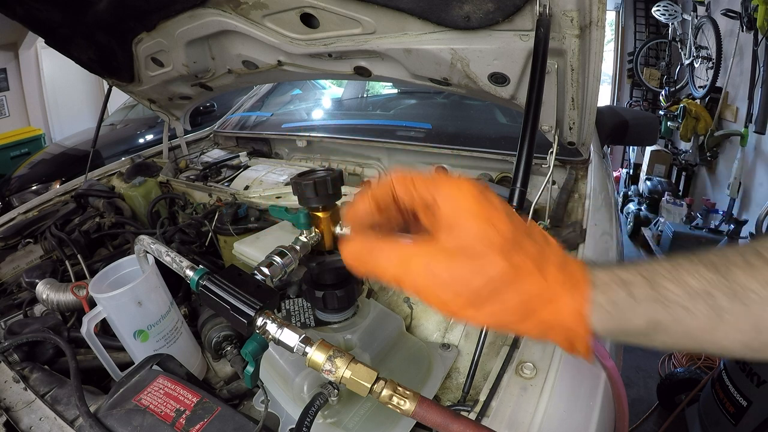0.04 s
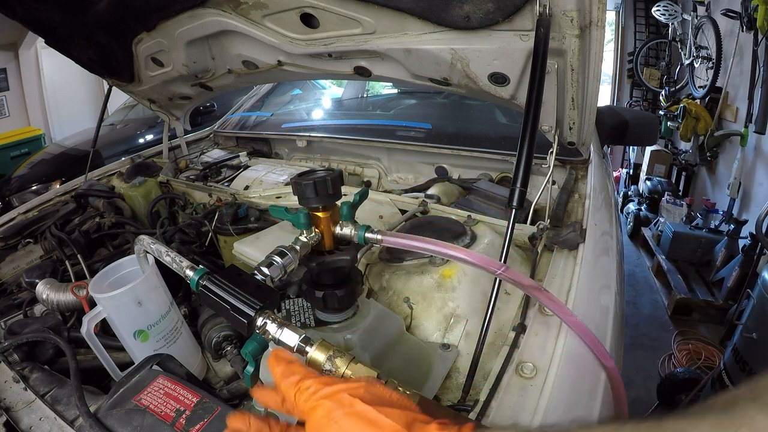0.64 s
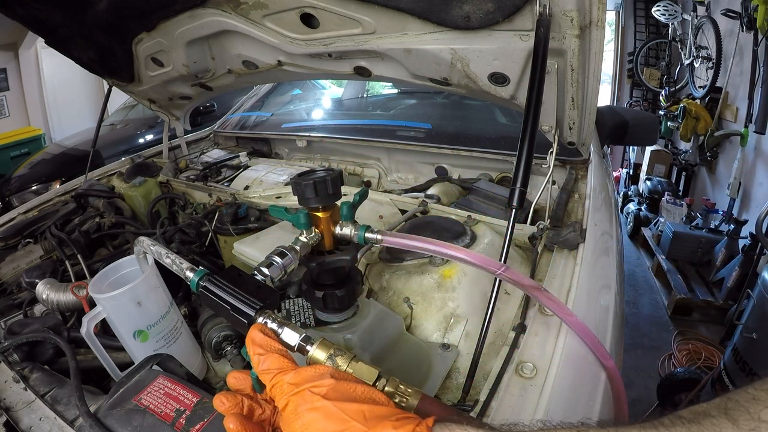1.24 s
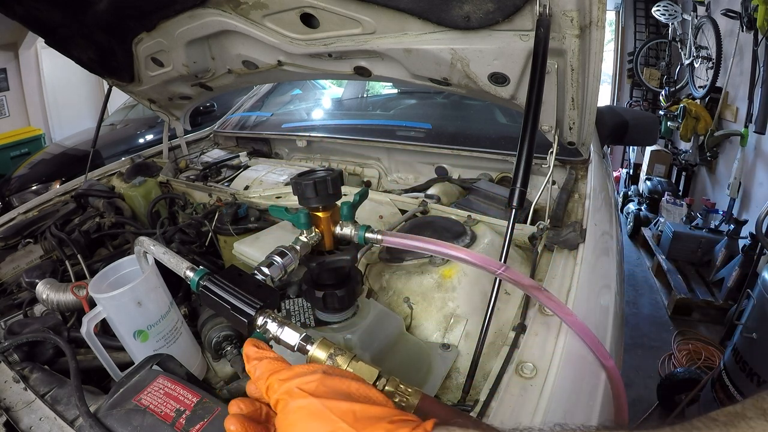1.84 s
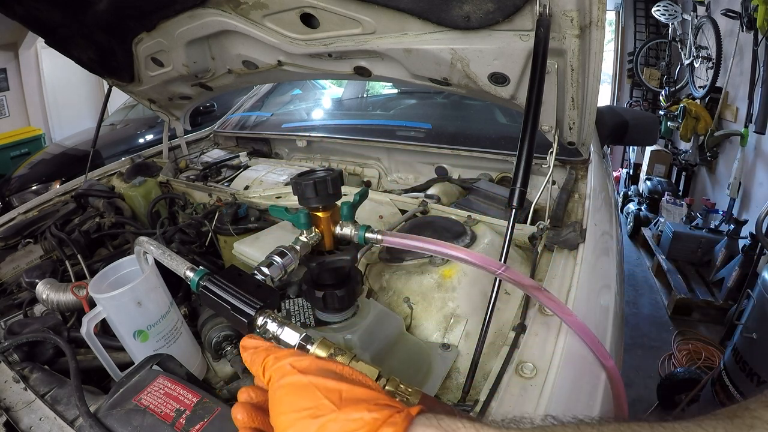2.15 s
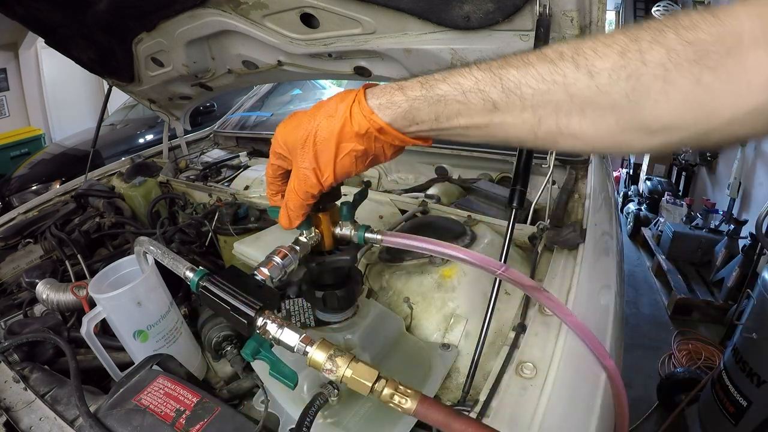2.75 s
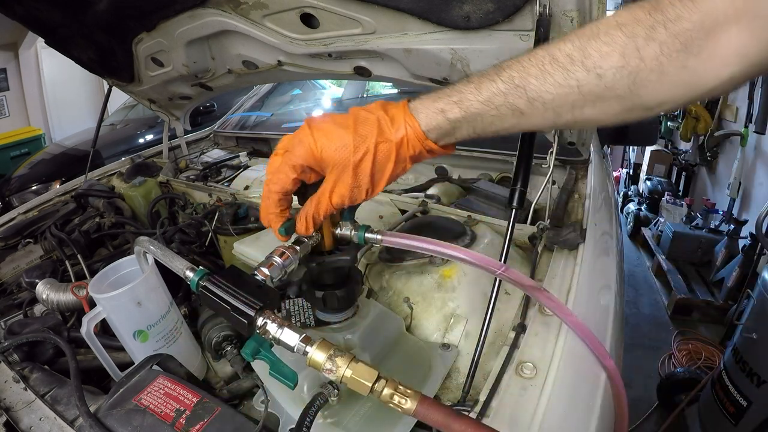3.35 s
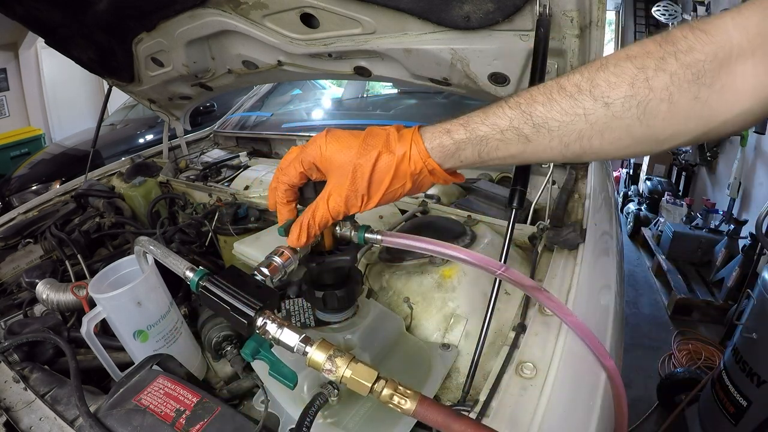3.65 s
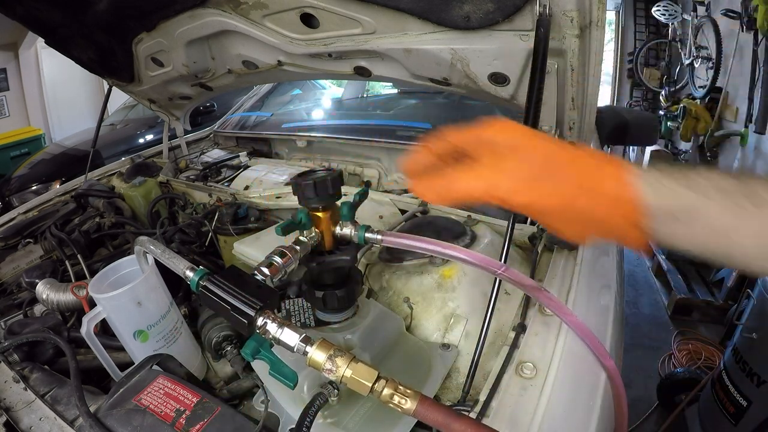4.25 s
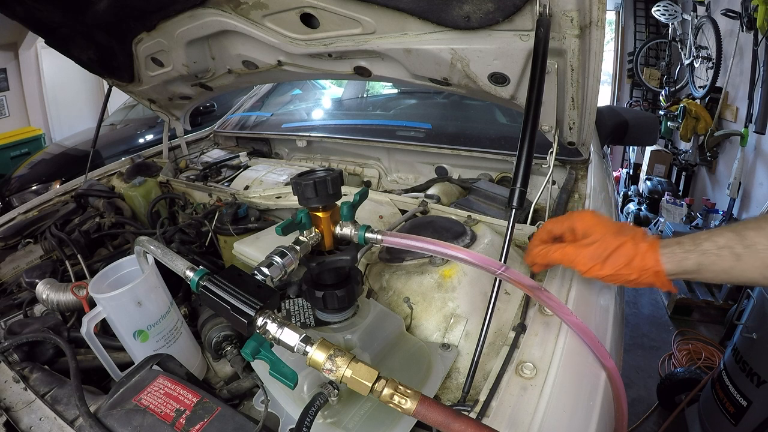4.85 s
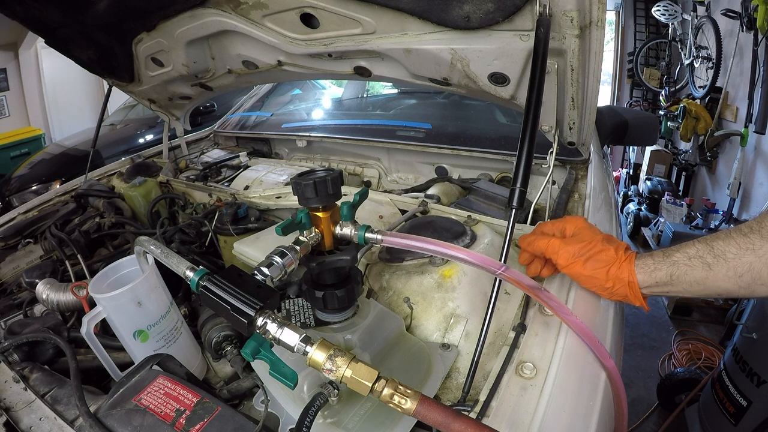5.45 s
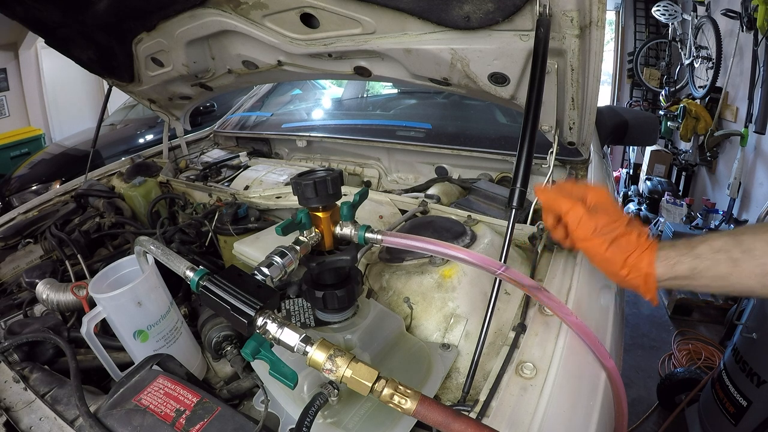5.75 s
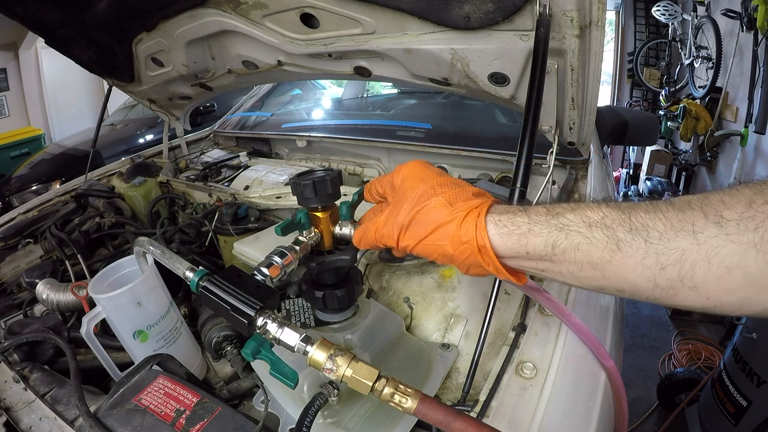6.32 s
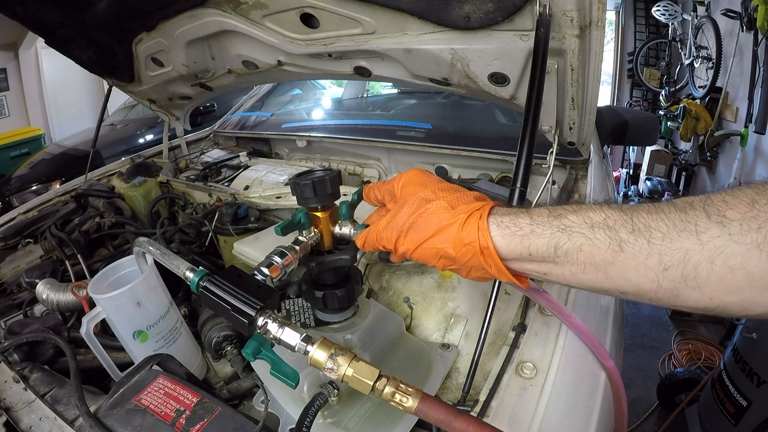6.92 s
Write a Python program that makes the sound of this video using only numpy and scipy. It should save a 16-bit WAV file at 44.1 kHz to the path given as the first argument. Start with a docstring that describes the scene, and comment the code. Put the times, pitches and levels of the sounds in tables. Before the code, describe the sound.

From the start, a piston air compressor runs at a steady speed in a garage, with a fast low throb, knocking and a rattling clatter over faint room noise. At about 1.7 seconds a valve opens on a suction tool in a car's engine bay, and a strong, bright hiss of compressed air starts almost at once, with a slight ringing edge from the narrow nozzle. The microphone's gain drops, so the compressor recedes but keeps throbbing underneath. The hiss brightens a little over the next second. Around 2.9 seconds the tool starts drawing on a hose: the hiss turns slightly duller and gains a faint hollow tone, and the compressor sinks further. The hiss holds an even level until the end at about 7 seconds, its colour shifting subtly as a hand moves nearby, around 4 and 6 seconds. Everything is heard through one close microphone.

```python
"""First you hear a piston air compressor throbbing and clattering in a garage; it runs throughout.
Then a valve opens on a vacuum coolant filler in a car's engine bay, and air hisses through its
venturi, a narrow nozzle that makes suction. A second valve lets it draw on the hose, adding a hollow
tone. A gloved hand moves over the tool and shifts the colour of the hiss. The one microphone's
gain control turns the compressor down as the hiss grows."""
import sys
import numpy as np
from scipy import signal
from scipy.fft import rfft, irfft
from scipy.io import wavfile
from scipy.ndimage import uniform_filter1d

SR = 44100
rng = np.random.default_rng(int(sys.argv[2]) if len(sys.argv) > 2 else 0)


def inscribe(sig):
    """Save sig as 16-bit PCM at rate SR to the path in sys.argv[1].

    A 1-D sig is mono; a 2-D sig holds one channel per row.
    Samples are clipped to [-1, 1] before scaling.
    """
    pcm = np.round(np.clip(np.atleast_2d(sig).T, -1, 1) * 32767)
    wavfile.write(sys.argv[1], SR, pcm.astype(np.int16))


N = 316638
TIME = np.arange(N) / SR

# When each valve starts to open, and how long the turn takes.
AIR_OPENS_S, AIR_TURN_S = 1.718, 0.049
SUCTION_OPENS_S, SUCTION_TURN_S = 2.84, 0.14


def undb(db):
    """Turn decibels into a factor to multiply a sound by."""
    return 10 ** (np.asarray(db) / 20)


def unit(x):
    """Scale a signal so that its average size (rms) is 1."""
    return x / np.sqrt(np.mean(x ** 2))


def ease(s, start_s, length_s):
    """A smooth move from 0 to 1, as when a valve is turned or a hand settles on it."""
    return np.sin(np.pi / 2 * np.clip((s - start_s) / length_s, 0, 1)) ** 2


def slope(points, hz):
    """Join (Hz, dB) points with straight lines on a scale of octaves."""
    point_hz, db = np.transpose(points)
    return np.interp(np.log(hz + 1), np.log(point_hz), db)


def bell(hz, centre, width):
    """A rounded peak of height 1; its width is taken at half height."""
    return 2 ** -((2 * (hz - centre) / width) ** 2)


def bells(table, hz):
    """Add up a table of peaks and dips, in dB."""
    return sum(db * bell(hz, centre, width) for centre, width, db in table)


def noise(db_of):
    """Noise of rms 1; db_of(Hz) says how strong each frequency is next to the others."""
    hz = np.arange(N // 2 + 1) * SR / N
    return unit(irfft(rfft(rng.standard_normal(N)) * undb(db_of(hz)), N))


def walk(rate_hz):
    """A smooth random wobble, about 1 in size, that picks rate_hz new values a second."""
    hold = int(SR / rate_hz)
    steps = np.repeat(rng.standard_normal(N // hold + 1), hold)
    return 1.218 * uniform_filter1d(uniform_filter1d(steps, hold), hold)[:N]


def garage_air():
    """The still air of the garage: a faint, low rush."""
    # Each row: frequency in Hz, relative level in dB.
    colour = [(20, -6), (45, 5), (130, -6), (280, -12), (480, -11), (800, -5.5), (1500, -12.5), (4000, -32),
              (15000, -38)]
    return undb(-47.5) * noise(lambda hz: slope(colour, hz))


def revolve(turns, gains, scatter_rad, size=8192):
    """Tones at 1, 2, 3, .. times the shaft speed repeat every turn; walls scatter their phases."""
    phases = scatter_rad * rng.standard_normal(len(gains))
    tones = np.r_[0, gains * np.exp(1j * phases)]
    cycle = irfft(tones, size) * size / np.sqrt(2)
    return np.interp(turns % 1, np.arange(size + 1) / size, np.r_[cycle, cycle[0]])


def rattle(turns, gains, change_hz=9, patterns=4):
    """Loose parts repeat their pattern for a few turns, then drift into another just as strong."""
    shares = np.array([walk(change_hz) for _ in range(patterns)])
    shares = shares / np.linalg.norm(shares, axis=0)
    return sum(share * revolve(turns, gains, np.pi) for share in shares)


def clatter(turns, shaft_hz):
    """The compressor's casing rattles and its valves rasp, swelling on both strokes of each turn."""
    # The clatter's broad colour. Each row: frequency in Hz, relative level in dB.
    colour = [(700, -5.5), (1100, 2), (1450, 2), (1700, -6.5), (2600, -2.5), (3400, -3), (4300, -16.5),
              (5400, -21.5), (6500, -12.5), (7700, -29), (8500, -21.5), (9300, -28), (10500, -20.5),
              (11700, -33)]
    # Where the casing rings. Each row: centre in Hz, width in Hz, boost or cut in dB.
    casing_bands = [(793, 91, 13.5), (1210, 130, -4), (1420, 160, 4.5), (1844, 71, 6), (1950, 98, -1),
                    (2600, 150, 3.5), (3000, 160, -1.5), (3310, 240, 2.5), (6070, 170, -1)]

    def colour_db(hz):
        return slope(colour, hz) + bells(casing_bands, hz)

    tone_hz = np.arange(1, 256) * shaft_hz
    casing = unit(rattle(turns, undb(colour_db(tone_hz)) * (tone_hz > 1550)))
    valves = noise(lambda hz: colour_db(hz) - 12 * np.log2(1 + (450 / (hz + 1)) ** 2))  # bass cut away
    swell_db = np.cos(4 * np.pi * turns) + 0.4 * np.cos(2 * np.pi * turns) + 0.27 * walk(27)
    return undb(swell_db) * (undb(-43.7) * casing + undb(-42) * valves)


def compressor(shaft_hz=28.55):
    """The intake throbs, the pistons knock and the valves clatter as the shaft turns steadily."""
    # The pistons' tones; two strokes a turn make the even ones strong.
    # Each row: multiple of the shaft speed, relative level in dB.
    piston_tones = [(1,-16), (2,-0.5), (3,-21.5), (4,-25), (5,-38.5), (6,-25.5), (7,-40.5), (8,-22),
                    (9,-47), (10,-36), (11,-30.5), (12,-22), (13,-33), (14,-24), (15,-32.5), (16,-13.5),
                    (17,-34), (18,-17), (19,-30), (20,-19.5), (21,-29.5), (22,-24), (23,-34), (24,-28),
                    (25,-32), (26,-31), (27,-23.5), (28,-29), (29,-27), (30,-37), (31,-30.5), (32,-32.5),
                    (33,-28), (34,-31), (35,-24), (36,-27), (37,-29.5), (38,-16.5), (39,-28), (40,-32),
                    (41,-42), (42,-36), (43,-34), (44,-32), (45,-28), (46,-28), (47,-29), (48,-21.5),
                    (49,-29.5), (50,-29), (51,-27.5), (52,-25.5), (53,-24.5), (54,-32.5)]
    multiple, db = np.transpose(piston_tones)
    turns = np.cumsum(shaft_hz * (1 + 0.000399 * walk(3))) / SR
    low, high = undb(db) * (multiple <= 6), undb(db) * (multiple > 6)
    throb = revolve(turns, low, scatter_rad=np.pi)
    # Higher tones repeat less exactly, but those that tower over their neighbours stay steady.
    loose_limit = undb(uniform_filter1d(db, size=5) + 3)
    loose = np.minimum(high, loose_limit) * np.clip(multiple / 54, 0, 1) ** 1.67
    steady = np.sqrt(np.maximum(high ** 2 - loose ** 2, 0))
    knock = revolve(turns, steady, scatter_rad=1.54) + rattle(turns, loose)
    return undb(-27.5) * throb + undb(-27) * knock + clatter(turns, shaft_hz)


def jet_noise():
    """Swirling air rings the nozzle and its exhaust tube; echoes in the engine bay cancel some bands."""
    # The jet's broad colour. Each row: frequency in Hz, relative level in dB.
    colour = [(40,-19), (280,-35), (450,-20.5), (750,-26), (1100,-17.5), (1700,-14), (2500,-25.5),
              (3000,0.5), (4200,-10.5), (6500,-18), (8000,-14), (10500,-17), (12000,-18.5), (15200,-21.5)]
    # Where the nozzle and tube ring. Each row: centre in Hz, width in Hz, boost in dB.
    nozzle_peaks = [(1050,74,6), (1847,100,7.5), (2162,203,9), (2530,120,11.5), (2788,23,5), (3254,100,2.5),
                    (3446,60,10), (4668,203,8.5), (5060,230,5), (5460,185,8), (5944,130,9), (6543,480,14.5),
                    (7560,920,3.5), (9310,280,6), (10160,59,5.5), (10640,280,7), (12340,130,7.3),
                    (13000,120,3.5), (13310,100,4), (13580,140,11), (13910,130,6), (14900,270,8.5)]
    # Where echoes cancel. Each row: centre in Hz, width in Hz, cut in dB.
    bay_dips = [(654,120,-3.5), (978,79,-9.5), (1393,63,-17), (1726,207,-11), (2033,43,-10), (2590,50,-3),
                (2918,41,-15), (3084,210,-6), (3330,31,-3), (3492,258,-13), (4200,120,-4.5),
                (4797,127,-7.5), (5300,110,-0.5), (5760,60,-12), (9120,250,-11), (9570,120,-10),
                (10800,130,-8), (11800,50,-6), (11970,150,-7), (12620,120,-7)]
    return noise(lambda hz: slope(colour, hz) + bells(nozzle_peaks, hz) + bells(bay_dips, hz))


def reflections(hz, reach, depth_db=2.5, shift_s=0.00007, paths=20):
    """Nearby surfaces put ripples (dB) in the treble; the reaching arm changes each echo's delay."""
    delays = rng.uniform(0.004, 0.015, size=paths)
    shifts = shift_s * rng.standard_normal(paths)
    ripple = sum(np.cos(2 * np.pi * hz * (delay + shift * reach)) for delay, shift in zip(delays, shifts))
    return depth_db * unit(ripple) * np.sqrt(np.minimum(hz / 9000, 1))


def hand_colour(hz, s, reach):
    """The arm boosts or blocks bands of the hiss (dB); so does the hand as it grips the hose valve."""
    # The arm's effect. Each row: centre in Hz, width in Hz, change over its full reach in dB.
    arm_bands = [(3250, 160, 1.5), (4600, 160, 2), (7400, 270, 4), (8400, 500, -1.5), (9200, 300, 6),
                 (10450, 700, -2.5), (12700, 300, 2.5), (13900, 500, 1)]
    # The grip's effect. Each row: centre in Hz, width in Hz, change in dB.
    grip_bands = [(3780, 300, 2.5), (6500, 480, -2.5), (8280, 160, 3), (9900, 220, 5), (11600, 330, -3)]
    arm = (reach - np.mean(reach)) * bells(arm_bands, hz)
    grip = ease(s, start_s=6.1, length_s=0.35) * bells(grip_bands, hz)
    return arm + grip


def suction_flow(s, empty_s=0.47):
    """Air drawn in, 0 to 1: it fades as the tool empties and returns when the suction valve opens."""
    emptying = np.exp(-np.maximum(s - AIR_OPENS_S, 0) / empty_s)
    return np.maximum(emptying, ease(s, SUCTION_OPENS_S, SUCTION_TURN_S))


def suction_colour(hz, flow, reach):
    """Suction adds a hollow tone, which the hand weakens, and lifts the tube's lowest ring (dB)."""
    hollow = flow * (15 - 5 * reach) * bell(hz, centre=1288, width=75)
    tube = np.interp(flow, [0, 1], [-3.5, 0.2]) * bell(hz, centre=2930, width=210)
    return hollow + tube


def notch(hz, s, drift_start_s=3.4, rise_hz_per_s=41):
    """A narrow dip in the hiss (dB) holds still, then drifts upward and grows shallower."""
    drift_s = np.maximum(s - drift_start_s, 0)
    depth_db = np.interp(drift_s, [0, 0.5], [-12, -6.3])
    return depth_db * bell(hz, centre=7190 + rise_hz_per_s * drift_s, width=290)


def venturi(jet_db=-23, suction_boost_db=3):
    """Compressed air hisses through the nozzle; suction and the moving hand reshape the sound."""
    # The hand's path. Each row: time in seconds, reach from 0 (at the air valve) to 1 (atop the tool).
    hand_path = [(1.7, 0.32), (2.35, 0.05), (2.8, 1), (3.9, 1), (4.5, 0.15), (5.6, .4), (6.25, 0.84),
                 (7.18, 1)]
    # Cut the noise into short frames, so that its colour can change over time.
    framing = dict(fs=SR, nperseg=2048, noverlap=1536)
    hz, s, frames = signal.stft(jet_noise(), **framing)
    hz = hz[:, None]
    flow = suction_flow(s)
    reach = np.interp(s, *np.transpose(hand_path))
    hand_db = reflections(hz, reach) + hand_colour(hz, s, reach)
    # The jet is duller while it draws, and while the air valve is partly shut.
    shut = 1 - ease(s, AIR_OPENS_S, AIR_TURN_S)
    db_per_octave = np.interp(flow, [0, 1], [1.6, 0.26]) - 7 * shut
    tilt_db = db_per_octave * np.log2(np.maximum(hz, 1000) / 5500)
    colour_db = suction_colour(hz, flow, reach) + notch(hz, s) + hand_db + tilt_db
    hiss = signal.istft(frames * undb(colour_db), **framing)[1][:N]
    # The jet flutters a little, most in the middle of its range.
    middle = signal.sosfiltfilt(signal.butter(2, [4200, 5600], "bandpass", fs=SR, output="sos"), hiss)
    hiss = hiss + middle * (undb(0.67 * walk(30)) - 1)
    flutter_db = 0.17 * walk(14) + 0.4 * walk(120)
    level_db = jet_db + suction_boost_db * ease(TIME, SUCTION_OPENS_S, SUCTION_TURN_S)
    return hiss * ease(TIME, AIR_OPENS_S, AIR_TURN_S) * undb(level_db + flutter_db)


def scene():
    """Garage air, compressor and venturi, the same in both ears."""
    fade_in = np.minimum(TIME / 0.003, 1)
    mono = (garage_air() + compressor() + venturi()) * fade_in
    return np.array([mono, mono])


def duck(level_db, threshold_db, share, response_s):
    """A gain that eases down by a share of however far the level is above the threshold."""
    step = 1 / (response_s * SR)
    excess_db = np.maximum(level_db - threshold_db, 0)
    return undb(-share * signal.lfilter([step], [1, step - 1], excess_db))


def record(dry, split_hz=143, top_hz=15250):
    """The hiss pushes the microphone's gain down, the bass later and less; the highest treble is cut."""
    bass = signal.sosfiltfilt(signal.butter(2, split_hz, fs=SR, output="sos"), dry)
    upper = dry - bass
    level_db = 10 * np.log10(uniform_filter1d(upper[0] ** 2, size=2048))
    bass_gain = duck(level_db, threshold_db=-22.5, share=0.75, response_s=0.19)
    upper_gain = duck(level_db, threshold_db=-26, share=0.93, response_s=0.052)
    treble_cut = signal.ellip(16, 0.1, 80, top_hz, fs=SR, output="sos")
    return signal.sosfilt(treble_cut, bass * bass_gain + upper * upper_gain)


dry = scene()
out = record(dry)
inscribe(out)
```